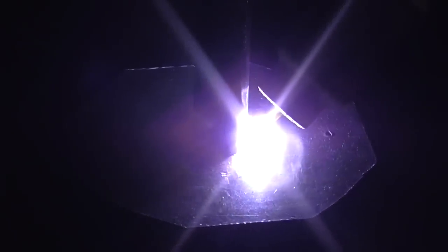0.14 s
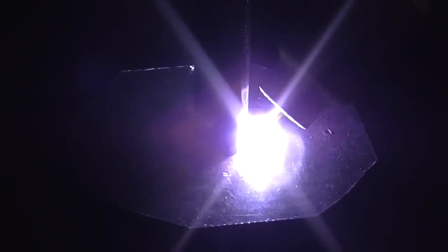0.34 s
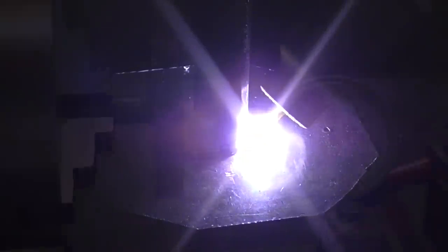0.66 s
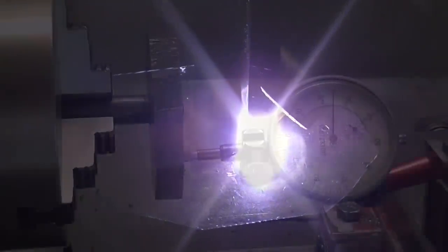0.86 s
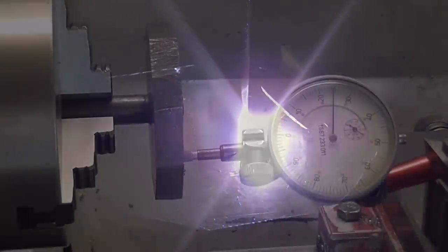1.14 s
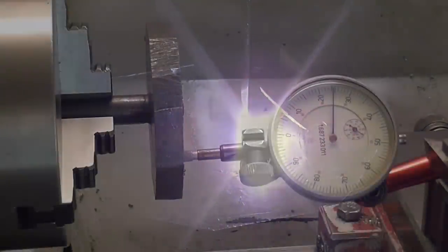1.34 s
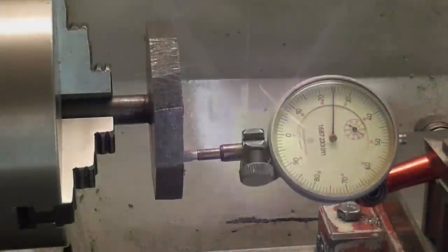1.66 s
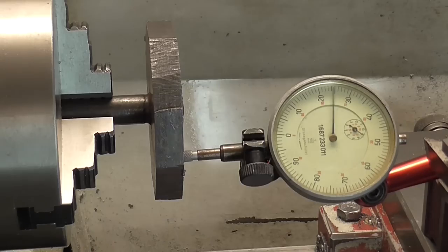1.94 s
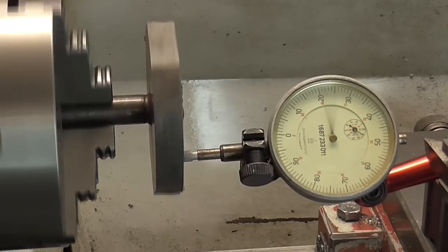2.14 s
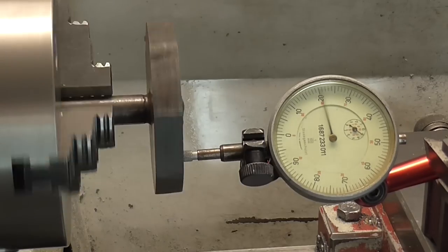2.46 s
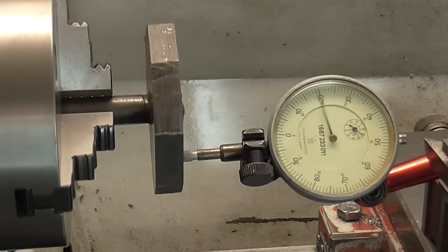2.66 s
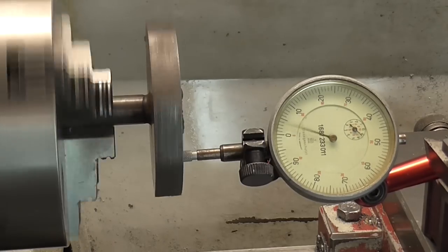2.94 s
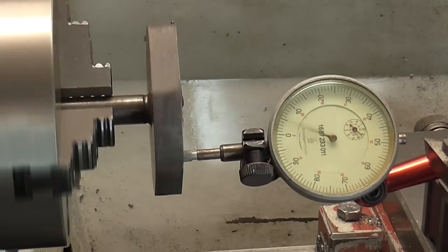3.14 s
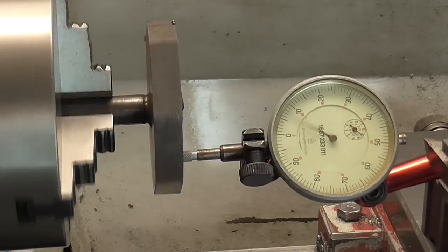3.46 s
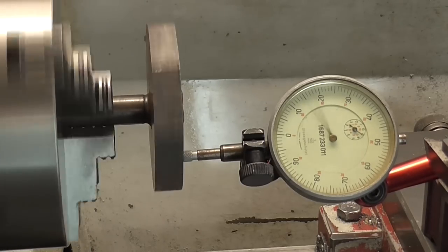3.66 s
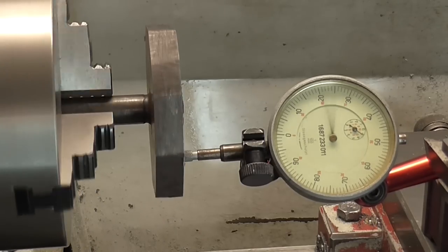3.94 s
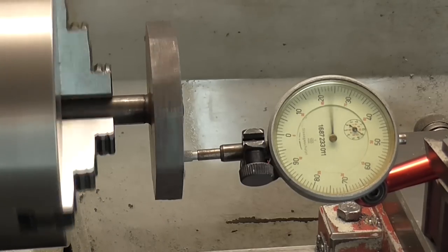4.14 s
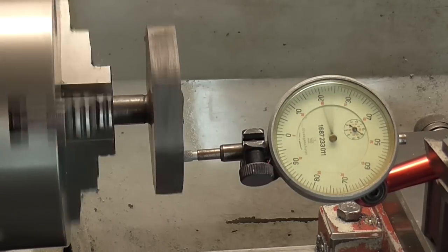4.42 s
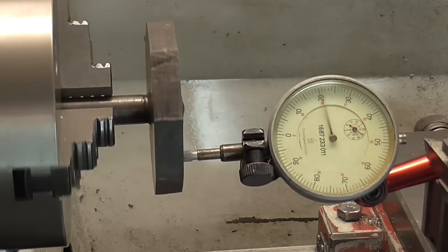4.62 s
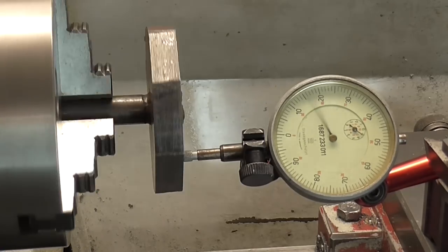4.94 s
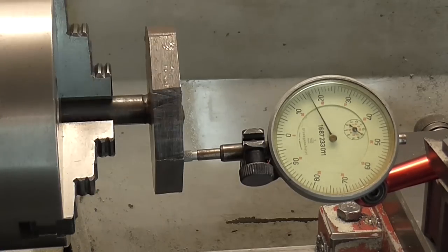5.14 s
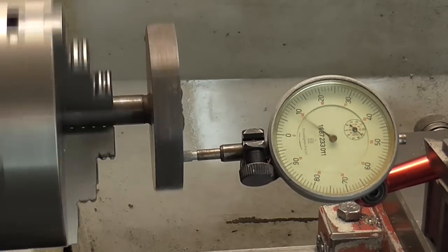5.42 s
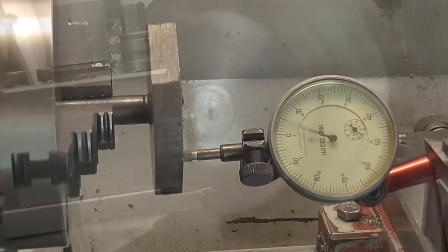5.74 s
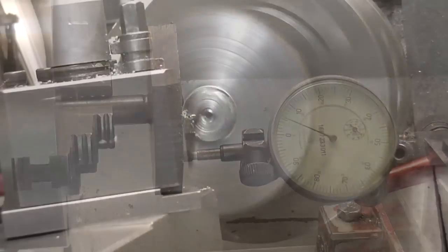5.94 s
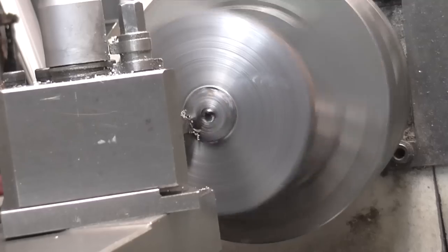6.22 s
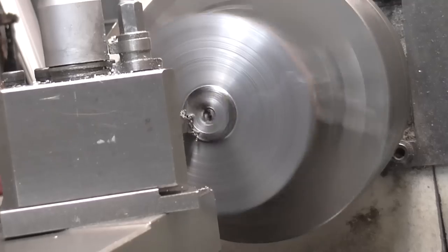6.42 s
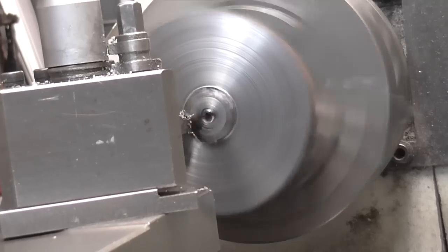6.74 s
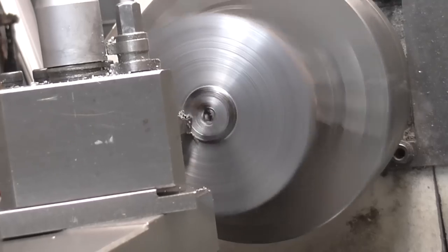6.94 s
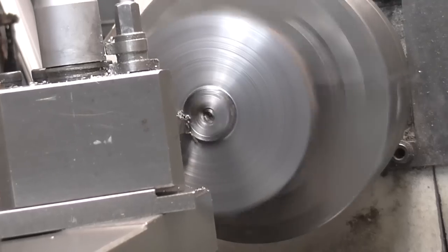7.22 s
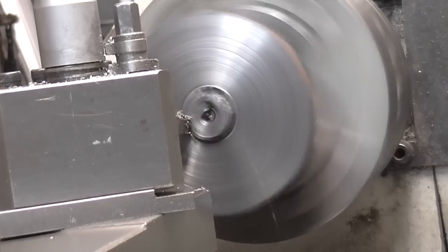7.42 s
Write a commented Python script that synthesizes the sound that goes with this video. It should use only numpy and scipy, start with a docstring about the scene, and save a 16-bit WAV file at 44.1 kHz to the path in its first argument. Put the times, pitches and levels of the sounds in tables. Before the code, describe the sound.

In a small workshop, a close welding arc gives a steady low rush and fan buzz with light sizzle, fading by two seconds. A slow lathe then hums very quietly while a gauge tip scrapes in rapid ticking pulses and sings thinly. The turning briefly stops and restarts. Near six seconds a much louder facing cut swells in, roaring, whining, thumping and rattling as chips snap.

```python
"""Welding and turning in a home workshop

A welding arc hisses over the buzz of the welder's fan and fades away: shaped noise and fan tones.
Then a lathe turns slowly: gears rumble and hum, while a gauge tip scrapes, clacks and sings on a steel plate.
Last, the lathe faces the plate at speed: gears whine, the uneven cut thumps and chips snap off.
Noise makes the rushes and scrapes, sines make the tones, and short noisy blows ring the metal parts.
Soft reflections widen each of the three parts, and a quiet shop noise lies under them all."""
import sys
import numpy as np
from scipy import signal
from scipy.fft import rfft, irfft, next_fast_len
from scipy.io import wavfile
from scipy.ndimage import map_coordinates

SR = 44100
rng = np.random.default_rng(int(sys.argv[2]) if len(sys.argv) > 2 else 0)


def wav_out(sig):
    """Save sig, one row per channel (or a flat mono array), as 16-bit PCM at SR to the path in sys.argv[1]."""
    wavfile.write(sys.argv[1], SR, np.round(np.clip(np.atleast_2d(sig).T, -1, 1) * 32767).astype(np.int16))


N = 334278
TIME = np.arange(N) / SR  # seconds
CROSSFADE_FROM_S, CROSSFADE_TO_S = 5.7, 6.12  # slow turning gives way to the facing cut

# Ringing of the tool post. Each row: pitch in Hz, width in Hz, relative level in dB.
POST = [(663, 17.7, 7.5), (893, 45, -22), (1390, 110, -7), (1443, 120, -7), (1870, 28, -27)]


def facing():
    """The tool tears metal, the uneven cut thumps the bed, and breaking chips snap, rattle and ping."""
    # Rush of the tearing metal. Each row: frequency in Hz, relative level in dB.
    hiss_outline = [(1290, -19), (2200, -5), (2770, -0.5), (3000, -6.5), (3500, -4), (3990, -9.5),
                    (4370, -2), (5060, -2), (5540, -6.5), (7310, -10), (9650, -10.5), (12400, -15.5),
                    (14000, -29), (15500, -40)]
    # Ringing of the tool's shank. Each row: pitch in Hz, width in Hz, relative level in dB.
    shank_modes = [(2570, 86, 6), (3016, 37, 11), (3230, 130, -25)]
    # Ringing of the cutting tool. Each row: pitch in Hz, width in Hz, relative level in dB.
    tool_modes = [(1936, 82, 0.5), (3220, 200, -8.5), (4760, 1200, -13.5), (7100, 1300, 2),
                  (9800, 2800, -3.5)]
    # Ringing of the lathe bed. Each row: pitch in Hz, width in Hz, relative level in dB.
    bed_modes = [(181, 15, -15), (256, 45, -8.5), (337.8, 18.2, -3), (479, 50, -20.5)]
    # Thin squeals of the tool. Each row: middle in seconds, length in seconds, level in dB.
    squeal_times = [(6.6, 0.13, -54), (6.98, 0.09, -45.5), (7.18, 0.062, -51), (7.49, 0.2, -62)]
    # Hardest thumps of the uneven cut. Each row: start in seconds, relative peak in dB.
    hard_thumps = [(5.883, -5.5), (5.951, -3), (6.15, 4), (6.243, 2), (6.27, 6), (6.412, 6), (6.481, -1),
                   (6.53, 1), (6.608, 4), (6.746, 2.5), (6.925, 4), (6.985, 5), (7.059, 6), (7.14, 3.5),
                   (7.39, 4), (7.43, 3.5)]
    # Hardest breaks of the chip. Each row: start in seconds, then the relative peaks in dB
    # of the tool's snap, the post's rattle and the shank's ping.
    hard_chips = [(5.915, -20, -9.5, -31), (6.009, -25, -9, -27), (6.365, -22, 0.5, -31),
                  (6.436, -18.5, -10, -27), (6.52, -25, -5, -24.5), (6.604, -16.5, -6.5, -33),
                  (6.64, -18, -6.5, -24.5), (6.84, -21.5, -10, -32), (6.89, -16.5, -4, -22),
                  (6.938, -16.5, -3.5, -29), (6.993, -31, -0.5, -38), (7.063, -22, -1.5, -36),
                  (7.143, -47, 0, -22.5), (7.2, -29, -26, -27), (7.257, -23.5, -5.5, -40),
                  (7.324, -23, -11, -20.5), (7.443, -21.5, -23, -21), (7.494, -47, -1, -36),
                  (7.56, -46, -1, -43)]
    # Lighter breaks: relative peaks in dB of the snap, the rattle and the ping.
    light_chip_db = (-27, -11.5, -33)
    tear_db = -37
    thumps_per_s, thump_db, thump_spread_db = 15, -5.5, 0.5  # the lighter thumps
    chips_per_s, chip_spread_db = 25, 3  # the lighter breaks

    fade = ramp(CROSSFADE_FROM_S, CROSSFADE_TO_S)
    # the chip breaks in many small cracks, about 110 a second
    cracks = rng.exponential(1, N) * (rng.random(N) < 110 / SR)
    bursts = signal.lfilter([1], [1, -np.exp(-1 / (0.01 * SR))], cracks)  # each dies away in about 10 ms
    tearing = white() * (1 + 0.25 * bursts) * amp(0.77 * drift(22) + drift(150))
    rush = amp(-1.7) * unit(colour(tearing, hiss_outline))
    shank = amp(-12.5) * unit(ring(bursts * white(), shank_modes))
    hiss = amp(tear_db) * fade * (rush + shank)
    squeal = swells(squeal_times) * ring(white(), [(9740, 56, 0)])

    light_thumps = light_blows(cut_steps(thumps_per_s), fade * amp(thump_db), thump_spread_db, hard_thumps)
    thumps = blows(np.vstack([hard_thumps, light_thumps]), bed_modes,
                   contact_s=0.0052, tail_db=-19, tail_s=0.027)
    thumps = colour(thumps, [(50, -41), (160, -6.0), (245, 2.5), (290, -7.0), (345, 2.5), (410, -10.5),
                             (480, -3.0), (700, -14), (3000, -28)])

    light_chips = light_blows(cut_steps(chips_per_s), fade, chip_spread_db, hard_chips)
    # the snap, rattle and ping of one break start together
    snap_rows, rattle_rows, ping_rows = [
        np.vstack([np.array(hard_chips)[:, [0, k + 1]], light_chips + [0, db]])
        for k, db in enumerate(light_chip_db)]
    rattles = blows(rattle_rows, POST, contact_s=0.0047, tail_db=-7, tail_s=0.044)
    rattles = colour(rattles, [(200, -23), (550, -1), (2030, -4.5), (2300, -13), (6000, -29)])
    snaps = blows(snap_rows, tool_modes, contact_s=0.0016, tail_db=-6, tail_s=0.042)
    snaps = colour(snaps, [(1000, -11), (1900, 8.5), (9000, -6), (15000, -16)])
    pings = blows(ping_rows, shank_modes, contact_s=0.0011, tail_db=-14, tail_s=0.014)
    knocks = amp(-6.5) * thumps + amp(-7) * rattles
    return hiss + squeal + knocks + amp(-0.5) * snaps + amp(0.5) * pings


def running_lathe():
    """The bed roars and swings under the changing load of the cut, the carriage chatters, gears whine."""
    # Roar of the bed. Each row: frequency in Hz, relative level in dB.
    roar_outline = [(40, -65), (70, -38), (90, -39), (123, -30), (161, -6.5), (200, -2.5), (240, -2.5),
                    (297, -13), (341, -2.5), (385, -0.5), (440, -3.5), (500, -11.5), (560, -8), (800, -68)]
    # Chatter of the carriage. Each row: frequency in Hz, relative level in dB.
    carriage_outline = [(400, -29), (540, 0.5), (680, 1.5), (760, 2), (930, 0.5), (1020, -3), (1250, 0.5),
                        (1500, 0.5), (1680, -7), (2030, -5), (2200, -35), (3000, -27), (5000, -70)]
    # Motor hum, then gear whine. Each row: pitch in Hz, relative level in dB.
    whine_lines = [(100, -27), (250, -17), (280, -17), (468, -12.5), (544, -40), (869, -26), (921, -24.5),
                   (946, -22), (1046, -23), (1246, -26)]
    bed_db, carriage_db, whine_db = -19.5, -21.5, -17
    chatter_hz = 344  # the bed's main ringing, kept swinging by the cut
    load_swing_db, load_swings_per_s = 2.0, 13  # the load on the bed comes and goes

    swing = tones([(chatter_hz, -4.5)], 1 + 0.033 * drift(25), waver_db=1.0)
    bed = amp(-3.0) * unit(colour(white(), roar_outline)) + swing
    load_db = load_swing_db * drift(load_swings_per_s)

    # the motor's torque pulses with the mains
    buzz = 1 + 0.073 * np.sin(2 * np.pi * whine_lines[0][0] * TIME)
    shudder = buzz * amp(1.05 * drift(25) + 2.2 * drift(120))
    carriage = amp(-4.0) * unit(colour(white() * shudder, carriage_outline))
    carriage += amp(-6.0) * unit(ring(white() * shudder, POST))

    whine = tones(whine_lines, 1 + 0.0018 * drift(4), waver_db=3)
    machine = amp(bed_db + load_db) * bed + amp(carriage_db) * carriage + amp(whine_db) * whine
    return ramp(CROSSFADE_FROM_S, CROSSFADE_TO_S) * machine


def welding():
    """The arc's steady rush flutters slightly; the fan buzzes and shakes the welder's case."""
    # Low rush of the arc. Each row: frequency in Hz, relative level in dB.
    arc_outline = [(35, -59), (60, -53), (145, -12.5), (224, -8), (255, -4.5), (387, -0.5), (462, -6.5),
                   (501, -16.5), (552, -9), (669, -8.5), (953, -16), (1380, -14.5), (2800, -36),
                   (3640, -67), (6160, -120)]
    # Sizzle of the arc. Each row: frequency in Hz, relative level in dB.
    sizzle_outline = [(1800, -35), (2900, -8), (3800, 0), (4700, 2.5), (5800, -0.5), (7100, -1.5),
                      (8800, -13), (9600, -10.5), (10500, -20), (11400, -10), (12300, -16), (13300, -14),
                      (15500, -34)]
    # Fan with five blades. Each row: multiple of the shaft speed, relative level in dB.
    fan_lines = [(1, -28), (2, -33), (3, -31), (4, -17.5), (5, -6.5), (15, -24), (25, -19), (30, -19.5),
                 (35, -26)]
    # Ringing of the welder's case. Each row: pitch in Hz, width in Hz, relative level in dB.
    case_modes = [(167, 12, -40), (270.7, 22, -12.5), (401.5, 3.6, -16.5), (507.7, 16.5, -12),
                  (657, 40, -9.5), (1094, 13, -22), (1514, 74, -19.5)]
    fan_hz = 45.22  # average turns per second
    weld_db, fade_from_s, fade_to_s, fade_power = -20, 0.54, 1.9, 0.88

    flutter = amp(drift(90) + .5 * drift(7.13))
    arc = amp(-3.5) * unit(colour(white() * flutter, arc_outline))
    arc += amp(-19.5) * unit(colour(white() * flutter, sizzle_outline))
    speed = 1 + .002 * drift(10)
    fan = tones([(fan_hz * k, db) for k, db in fan_lines], speed, waver_db=1.0)
    case = amp(-0.5) * ring(white(), case_modes)
    fade = (1 - ramp(fade_from_s, fade_to_s)) ** fade_power
    return amp(weld_db) * fade * (arc + fan + case)


def gauge():
    """Gear teeth jolt the plate, so the gauge tip scrapes in pulses and clacks, more when pressed harder."""
    # Scrape of the tip. Each row: frequency in Hz, relative level in dB.
    scrape_outline = [(500, -29), (900, -6.5), (1550, 0.5), (1850, 4), (2100, 1.5), (2380, 3), (2750, -4),
                      (3350, 0), (4300, -10), (4700, -10), (5700, -5), (6500, -14), (8500, -32),
                      (15500, -41)]
    # Ringing of the gauge's stem. Each row: pitch in Hz, width in Hz, relative level in dB.
    stem_modes = [(2200, 90, -4), (2340, 200, 3.5), (4120, 200, -6), (3980, 280, 15.5), (4220, 140, 14),
                  (4930, 220, -7), (5600, 260, -4)]
    # Narrow ringing of the rubbed plate. Each row: pitch in Hz, width in Hz, relative level in dB.
    plate_modes = [(2100, 22, 5), (2146, 25, -7), (2340, 32, -6), (3850, 22, 3), (3975, 35, -5),
                   (4212, 45, -8), (4500, 35, 1)]
    # Ticking of the gauge's rack. Each row: pitch in Hz, width in Hz, relative level in dB.
    rack_modes = [(4930, 220, 5), (5620, 330, -7), (7100, 650, -9)]
    # Hardest clacks of the gear teeth. Each row: start in seconds, relative peak in dB.
    hard_clacks = [(2.1025, -34), (2.128, -38), (2.2538, -28), (2.3056, -26), (2.362, -25.5), (2.9748, -37),
                   (3.1894, -28), (3.6288, -21.5), (3.6806, -19), (3.7053, -23), (3.7566, -20.5),
                   (3.8054, -25), (3.831, -22.5), (3.8826, -23), (3.907, -20), (3.933, -20), (4.2615, -31),
                   (4.311, -27), (4.388, -25.5), (4.486, -32), (4.5138, -28), (4.7006, -34), (4.7516, -33),
                   (4.9282, -34), (5.031, -33)]
    # Gritty spots on the plate. Each row: start in seconds, relative peak in dB.
    grit_spots = [(2.38, -49), (2.745, -52), (3.345, -48), (4.752, -48), (5.03, -44.5), (5.13, -45),
                  (5.225, -47)]
    # Ringing of a gritty spot. Each row: pitch in Hz, width in Hz, relative level in dB.
    grit_modes = [(5600, 1400, 5), (7000, 1200, 1), (10500, 3000, -14)]
    teeth_per_s = 39.4  # nominal; the steps are bent a little to meet the hardest clacks
    resting_grip = 1  # contact of the tip between jolts, next to the jolts
    tooth_over_scrape_db, tooth_spread_db = 10, 2.5  # ordinary clacks: level over the pressure, scatter

    s = np.array(hard_clacks)[:, 0]
    count = np.cumsum(np.r_[0, np.round(np.diff(s) * teeth_per_s)])  # whole teeth between hard clacks
    tooth = np.interp(TIME, s, count - s * teeth_per_s) + TIME * teeth_per_s
    # a tooth strikes, then rebounds half a step later
    since = (np.array([tooth, tooth + .5]) % 1) / teeth_per_s
    age = since / 0.0041  # each pulse peaks after about 4 ms
    strike, rebound = age * np.exp(1 - age)
    jolt = (strike + 0.45 * rebound) * amp(2 * drift(22))
    grip = unit((resting_grip + jolt) * amp(2.3 * drift(200)))

    scrape = amp(-5.5) * unit(colour(grip * white(), scrape_outline))
    scrape += amp(-14.5) * unit(ring(grip * white(), stem_modes))
    scrape += amp(-8.5) * unit(ring(grip * white(), plate_modes))
    ticks = ring((strike + rebound) * white(), rack_modes)
    ticks = amp(-14) * unit(colour(ticks, [(2000, -14), (4500, 4), (7800, 1), (9500, -12)]))

    press = pressure()
    new_tooth = np.diff(np.floor(tooth)) > 0
    teeth = TIME[1:][new_tooth & (press[1:] > 0)]
    light_clacks = light_blows(teeth, press * amp(tooth_over_scrape_db), tooth_spread_db, hard_clacks)
    clacks = blows(np.vstack([hard_clacks, light_clacks]), stem_modes,
                   contact_s=.0019, tail_db=-12, tail_s=0.015)
    clacks = colour(clacks, [(800, -37), (2100, 8.0), (2800, -7), (4300, -2.5), (7500, -10.5), (15000, -22)])
    grit = blows(grit_spots, grit_modes, contact_s=0.0014, tail_db=2, tail_s=0.051)
    return press * (scrape + ticks) + amp(-1.0) * clacks + amp(2) * grit


def singing():
    """The rubbing tip trades between two high notes that grow with the pressure, and sometimes squeaks."""
    # The two notes of the tip. Each row: pitch in Hz, width in Hz, relative level in dB.
    tip_notes = [(9830, 36, 1.5), (10230, 25, 0)]
    # A higher overtone. Each row: pitch in Hz, width in Hz, relative level in dB.
    overtone = [(11400, 260, -4)]
    # Squeaks of the tip. Each row: start in seconds, length in seconds, pitch in Hz, level in dB.
    squeak_rows = [(3.568, .02, 3100, -56), (3.611, 0.025, 3620, -40), (3.634, 0.045, 3700, -43),
                   (3.909, .05, 9900, -52), (4.388, .04, 9520, -60)]
    sing_db, sing_at_db = -68, -42.5  # gain of the notes at this gain of the pressure
    sing_growth = 1.35  # dB gained per dB of pressure
    trades_per_s, trade_db = 4, 2.5  # pace of the trading, and its limit either way

    press = pressure()
    out = amp(-26.5) * press * ring(white(), overtone)
    strength = amp(sing_db) * (press / amp(sing_at_db)) ** sing_growth
    balance_db = trade_db * np.tanh(2 * drift(trades_per_s))
    for sign, (hz, width, db) in zip((-1, 1), tip_notes):
        note = amp(1) * tones([(hz, db)], 1 + 0.00061 * drift(25), waver_db=2.0)
        note += amp(-4.5) * ring(white(), [(hz, width, db)])
        out += strength * amp(sign * balance_db) * note
    for start, length, hz, db in squeak_rows:
        window = np.hanning(int(length * SR))
        squeak = unit(ring(rng.standard_normal(SR // 10), [(hz, 140, 0)]))
        add(out, start, amp(db) * window * squeak[:len(window)])
    return out


def slow_gears():
    """Slowly rolling gears hum and rumble in the headstock casting."""
    # Rumble of the gearbox. Each row: frequency in Hz, relative level in dB.
    rumble_outline = [(71, -55), (120, -22), (199, -20.5), (227, -2.5), (259, -18), (325, -3), (434, -7.5),
                      (471, -16.5), (609, 0), (1030, -43), (1400, -20.5), (1820, -19), (3080, -120)]
    # Ringing of the casting. Each row: pitch in Hz, width in Hz, relative level in dB.
    casting_modes = [(320, 18, -2.5), (474, 6.6, -9), (608, 50, -9), (689.5, 28, -7.5)]
    # Hum of the slow gears. Each row: pitch in Hz, relative level in dB.
    hum_lines = [(237, -7.5), (315, -23), (619, -28)]
    rumble_db, rumble_swell_db = -53, 1.37

    casting = colour(ring(white(), casting_modes), [(80, 7), (200, -4), (800, 4), (1300, -7)])
    roll = unit(colour(white(), rumble_outline)) + amp(1.0) * casting
    hum = tones(hum_lines, 1 + 0.00483 * drift(1.8), waver_db=1)
    level = amp(rumble_db + rumble_swell_db * drift(4))
    return turning() * level * (roll * amp(drift(20)) + hum)


def quiet_shop():
    """Steady, faint noise of the shop, shaped by its outline."""
    # Each row: frequency in Hz, relative level in dB.
    shop_outline = [(25, -21), (45, -20), (65, 2), (100, 0.5), (135, -8), (230, -8), (330, -1), (500, -12),
                    (900, -10.5), (1800, -15.5), (2080, -4), (2350, -9), (2700, -23), (3800, -16),
                    (7900, -20), (15500, -25)]
    return amp(-61) * unit(colour(white(), shop_outline))


def turning():
    """Motion of the slow spindle, 0 to 1: spins up, runs down, starts again and fades into the cut."""
    # Each row: switched on in seconds, spin-up in seconds, switched off in seconds, run-down in seconds.
    run_rows = [(2.06, 0.075, 5.24, 0.119), (5.39, 0.089, 6.1, 0.1)]
    runs = sum(ramp(on, on + up) * (1 - ramp(off, off + down)) for on, up, off, down in run_rows)
    return runs * (1 - ramp(CROSSFADE_FROM_S, CROSSFADE_TO_S))


def pressure():
    """How hard the turning plate rubs the gauge tip, as a gain."""
    # The plate wobbles against the tip once a turn, with lighter rubs between.
    # Each row: middle in seconds, length in seconds, pressure gain in dB.
    rub_rows = [(2.12, 0.085, -52), (2.3, 0.23, -43.5), (2.5, 0.2, -49), (2.68, 0.14, -46.5),
                (2.9, 0.2, -53), (3.08, 0.27, -43.5), (3.32, 0.14, -48), (3.79, 0.36, -42),
                (4.04, 0.18, -47), (4.42, 0.33, -44), (4.75, 0.2, -52), (5.05, 0.27, -50),
                (5.68, 0.35, -45.5)]
    light_touch_db = -62.5  # between the rubs
    return turning() * np.hypot(swells(rub_rows), amp(light_touch_db))


def cut_steps(per_s):
    """Almost even times throughout the facing cut."""
    jitter = 0.3  # scatter in time, as a share of a step
    steps = np.arange(CROSSFADE_FROM_S, TIME[-1], 1 / per_s)
    return steps + jitter / per_s * rng.standard_normal(256)[:len(steps)]


def light_blows(times, gain, spread_db, hard):
    """Rows (seconds, dB) of blows that follow a gain curve with scatter and give way to the hard ones."""
    scatter = np.clip(rng.standard_normal(size=256), -2, 2)[:len(times)]
    db = 20 * np.log10(np.interp(times, TIME, gain) + 1e-9) + spread_db * scatter
    nearest_hard = abs(times[:, None] - np.array(hard)[:, 0]).min(1)
    free = nearest_hard > np.diff(times).mean() / 2
    return np.column_stack([times, db])[free]


def blows(rows, modes, contact_s, tail_db, tail_s):
    """Each blow is a short burst of rubbing contact and a fading tail that ring the metal."""
    out, t = np.zeros(N), np.arange(SR // 5) / SR
    force = t / contact_s * np.exp(1 - t / contact_s) + amp(tail_db) * np.exp(-t / tail_s)
    for (s, db), rubbing in zip(rows, rng.standard_normal(size=(192, len(t)))):
        sound = ring(force * rubbing, modes)
        add(out, s, amp(db) * sound / abs(sound).max())
    return out


def ring(x, modes):
    """Drives resonances (Hz, width in Hz, dB); each is scaled to its own level and all are summed."""
    out = np.zeros(len(x))
    for hz, width, db in modes:
        r, turn = np.exp(-np.pi * width / SR), 2 * np.pi * hz / SR  # a narrower mode rings longer
        out += amp(db) * unit(signal.lfilter([1, 0, -1], [1, -2 * r * np.cos(turn), r * r], x))
    return out


def tones(lines, speed, waver_db):
    """Sines (Hz, dB) that follow one relative speed, each wavering in strength."""
    turns = np.cumsum(speed) / SR
    out = np.zeros(N)
    for hz, db in lines:
        out += amp(db + waver_db * drift(6)) * np.sin(2 * np.pi * (hz * turns + rng.random()))
    return np.sqrt(2) * out


def colour(x, spectrum):
    """Filters by an outline of (Hz, dB) points."""
    hz, db = np.transpose(spectrum)
    size = next_fast_len(N)
    bins = np.fft.rfftfreq(size, 1 / SR)
    gain = amp(np.interp(np.log(bins + 1), np.log(hz + 1), db))
    return irfft(rfft(x, size) * gain, size)[:N]


def swells(rows):
    """Gain of rounded swells (middle s, length s, dB); each is down to half at its ends."""
    squareness = 3.6  # higher gives a flatter top and steeper ends
    return sum(amp(db) * .5 ** np.minimum(abs(2 * (TIME - s) / length) ** squareness, 20)
               for s, length, db in rows)


def ramp(from_s, to_s):
    """Rises evenly from 0 to 1 between two times."""
    return np.clip((TIME - from_s) / max(to_s - from_s, 1 / SR), 0, 1)


def drift(per_s):
    """Smooth random wandering of rms 1, with two random points per step of the given rate."""
    points = rng.standard_normal(8192)
    curve = map_coordinates(points, [TIME[::20] * per_s * 2], order=3, mode="wrap")
    return unit(curve).repeat(20)[:N]


def white():
    """Plain noise, equally strong at all frequencies."""
    return rng.standard_normal(N)


def amp(db):
    """Decibels to gain."""
    return 10 ** (np.asarray(db) / 20)


def unit(x):
    """Scales to rms 1."""
    return x / np.sqrt(np.mean(x ** 2) + 1e-20)


def add(mix, s, sound):
    """Mixes a sound in at a time in seconds."""
    part = mix[max(round(s * SR), 0):][:len(sound)]
    part += sound[:len(part)]


def place(x, width, t60):
    """Diffuse reflections from nearby walls widen the sound, in ever-changing phase."""
    left_db = -1.4  # left channel against the right, in dB
    t = np.arange(SR // 4) / SR
    # two noisy tails that fall by 60 dB in t60 seconds
    taps = rng.standard_normal((2, len(t))) * amp(-60 * t / t60) * (t > .001)
    first, second = (signal.oaconvolve(x, tail / np.linalg.norm(tail))[:N] for tail in taps)
    angle = 3 * drift(12)  # radians
    side = colour(first * np.cos(angle) + second * np.sin(angle), width)
    return np.array([amp(left_db / 2) * (x + side), amp(-left_db / 2) * (x - side)])


def scene():
    """Welding, slow turning and facing follow one another over the quiet of the shop."""
    # Stereo width of each part. Each row: frequency in Hz, gain of the side signal in dB.
    weld_width = [(60, -38), (180, -16), (550, -13.5), (1650, -8.5), (4970, -11), (15000, -9.5)]
    turn_width = [(60, -3), (180, -9), (550, -8), (1650, -6), (4970, -15), (15000, 0.5)]
    cut_width = [(60, -24), (180, -22.5), (550, -13), (1650, -7), (4970, -11.5), (15000, -3.5)]
    weld = place(welding(), weld_width, t60=0.14)
    turn = place(slow_gears() + gauge() + singing() + quiet_shop(), turn_width, t60=0.038)
    # thin out the deep bass of the cut
    lathe = colour(running_lathe() + facing(), [(35, -8), (70, 2), (95, -0.5), (200, 0.5)])
    return weld + turn + place(lathe, cut_width, t60=0.063)


def record(dry):
    """Rounds off the loudest peaks, then removes the highest treble."""
    edge_hz = 15750
    rounded = dry / (1 + (dry / .93) ** 8) ** (1 / 8)
    low_pass = signal.firwin(1023, edge_hz, window=("kaiser", 9), fs=SR)
    return signal.oaconvolve(rounded, low_pass[None], "same")


dry = scene()
out = record(dry)
wav_out(out)
```